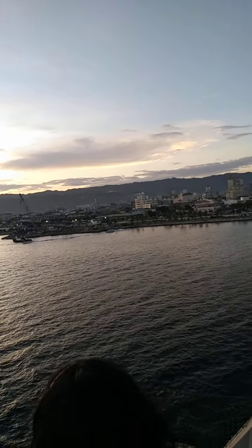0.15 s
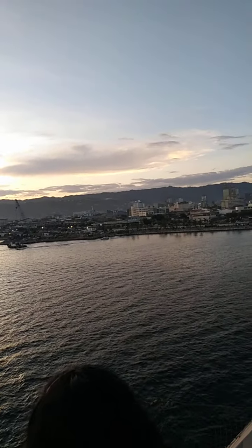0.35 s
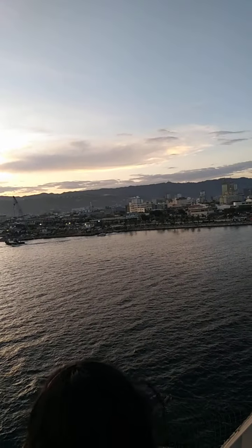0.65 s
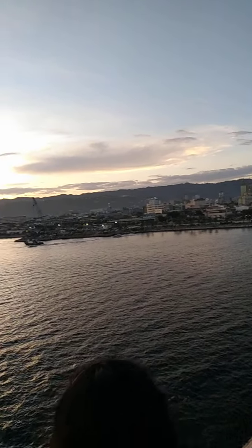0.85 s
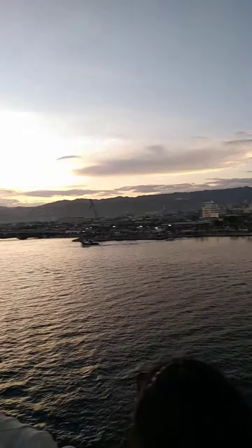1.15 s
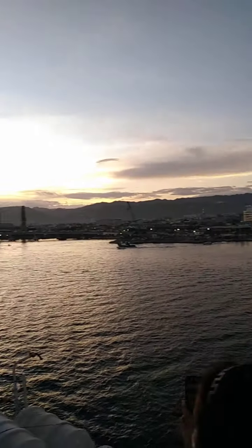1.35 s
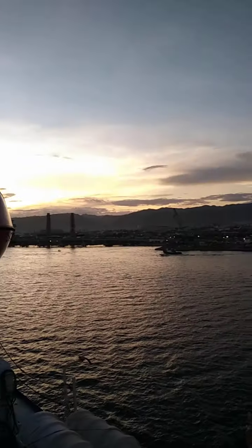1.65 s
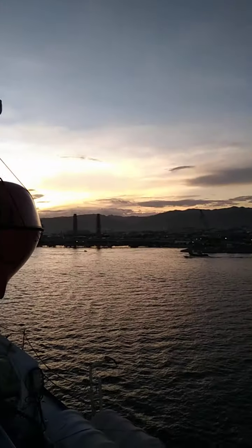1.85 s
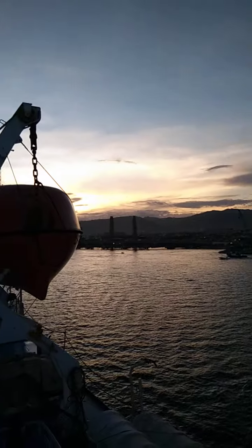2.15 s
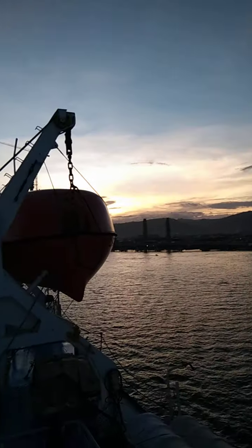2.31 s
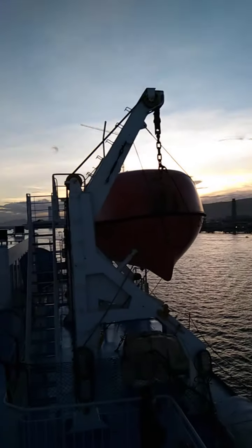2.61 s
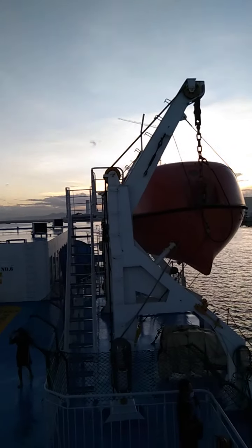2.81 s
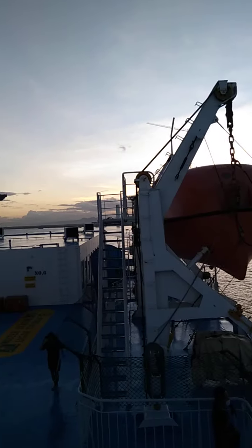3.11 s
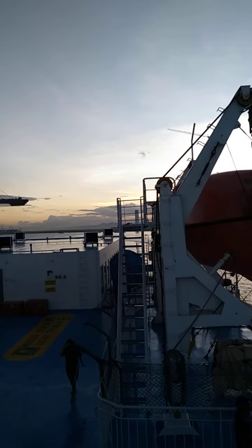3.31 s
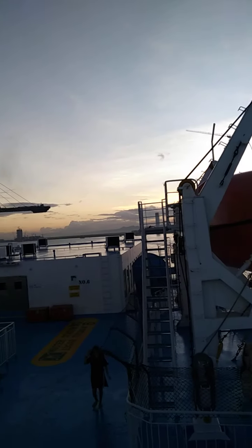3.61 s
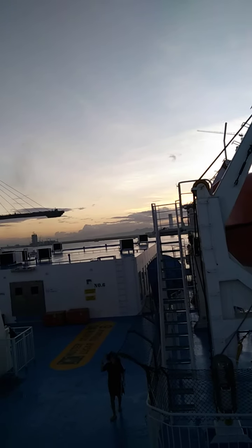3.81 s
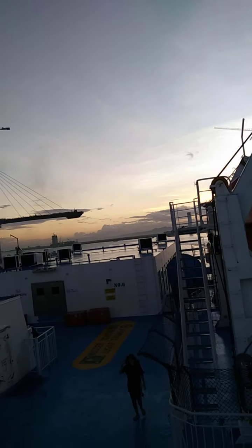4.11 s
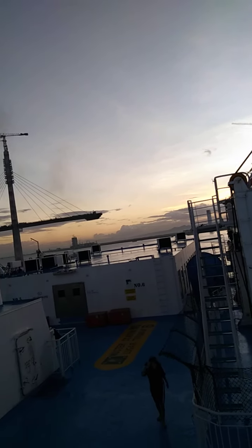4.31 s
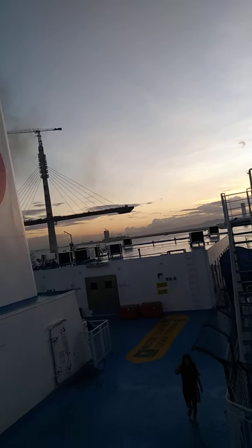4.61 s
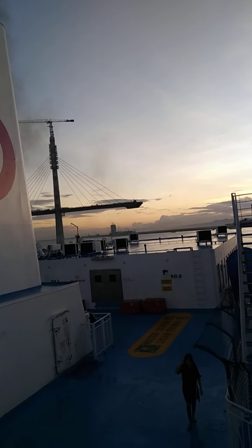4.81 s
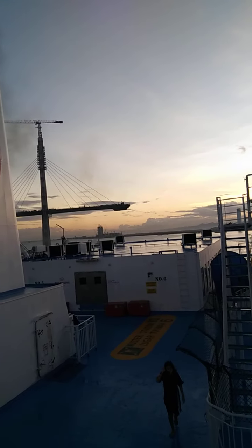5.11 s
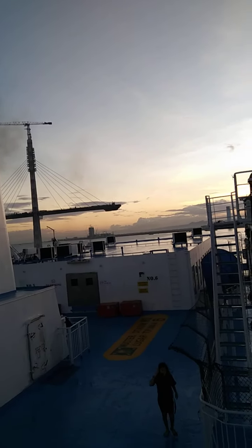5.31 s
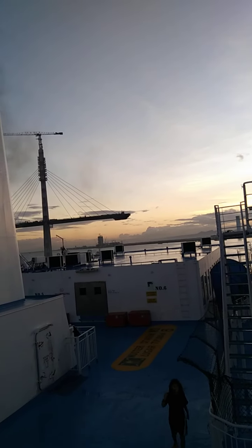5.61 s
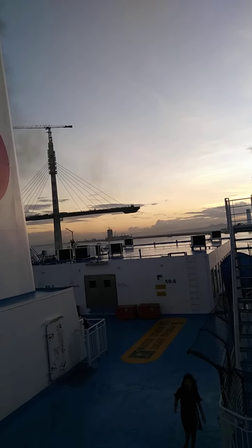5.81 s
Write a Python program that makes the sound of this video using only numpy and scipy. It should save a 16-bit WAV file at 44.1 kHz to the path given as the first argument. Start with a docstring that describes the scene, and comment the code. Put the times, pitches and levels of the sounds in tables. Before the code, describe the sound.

A ferry's steady diesel rumble and splashing water, with a brief whistling gust, followed by whirring ventilation.

```python
"""On a ferry's open deck, two diesels throb against each other from the start and a steel plate buzzes.
Water churns, gurgles and fizzes along the hull. At about 1.4 s come puffs of wind and the first of
a few light ticks. The puffs grow into one long, whistling hiss, which dies away near 3.5 s.
Then the listener turns toward the middle of the ship, and the whirr of the ventilation comes forward."""
import sys
import numpy as np
from scipy import signal
from scipy.fft import rfft, irfft
from scipy.io import wavfile

SR = 44100
rng = np.random.default_rng(int(sys.argv[2]) if len(sys.argv) > 2 else 0)


def unload_audio(sound):
    """Save the sound as a 16-bit wav file, at the path given as the first command line argument."""
    columns = np.transpose(np.atleast_2d(sound))
    # keep every value between -1 and 1, then stretch to whole-number steps
    steps = np.round(np.clip(columns, -1, 1) * 32767)
    wavfile.write(sys.argv[1], SR, steps.astype(np.int16))


N = 262386
T = np.arange(N) / SR
FREQS = np.maximum(np.fft.rfftfreq(N, 1 / SR), 1)


def gain(db):
    """Turn decibels into a number to multiply by."""
    return 10 ** (np.asarray(db) / 20)


def unit(x):
    """Scale a sound to an average strength (rms) of 1."""
    return x / np.sqrt(np.mean(x ** 2))


def curve(rows):
    """Join a timed table's points with straight lines, one curve for each column after the time."""
    times, *columns = np.transpose(rows)
    return [np.interp(T, times, column) for column in columns]


def db_at(hz, points):
    """Read the level at any pitch between (f/Hz, level/dB) points."""
    f, db = np.transpose(points)
    return np.interp(np.log(hz), np.log(np.sort(f)), db)


def colour(x, points):
    """Shape a sound's tone by (f/Hz, level/dB) points, fading beyond both ends; rms 1."""
    ends = 1 / (1 + (points[0][0] / FREQS) ** 8) / (1 + (FREQS / points[-1][0] / 1.11) ** 20)
    return unit(irfft(rfft(x) * gain(db_at(FREQS, points)) * ends, N))


def noise(points):
    """Smooth noise with the given tone; rms 1."""
    return colour(rng.standard_normal(N), points)


def wander(rate):
    """Smooth random drift of about 1 either way, with about `rate` new values a second."""
    size = int(N / SR * rate) + 4
    knots = rng.standard_normal(4096)[:size]
    return np.interp(T * rate * 8, np.arange(size * 8), signal.resample(knots, size * 8))


def band(hz, width_hz):
    """Noise gathered around one pitch."""
    phase = 2 * np.pi * hz * T
    return wander(width_hz) * np.cos(phase) + wander(width_hz) * np.sin(phase)


def swell(s, length_s):
    """A smooth rise and fall that peaks at time s."""
    out = np.zeros(N)
    near = slice(*np.searchsorted(T, [s - 2 * length_s, s + 2 * length_s]))
    out[near] = np.exp(-np.log(2) * (2 * (T[near] - s) / length_s) ** 2)
    return out


def grains(centre_hz, width_hz, fade_s, spread_db, count):
    """A swarm of tiny tones that fade in and out, scattered in time, pitch and strength; rms 1."""
    out, centre = np.zeros(N), centre_hz + 0 * T
    for when, pitch, span, softness, phase in rng.random((count, 5)):
        middle, half = int(when * N), int(SR * fade_s * (.6 + .8 * span))
        i = np.arange(max(middle - half, 0), min(middle + half, N))
        offset = i - middle
        hz = centre[middle] + width_hz * (pitch - .5)
        fade = np.cos(np.pi / 2 * offset / half) ** 2
        out[i] += gain(-spread_db * softness) * fade * np.sin(2 * np.pi * (hz * offset / SR + phase))
    return unit(out)


# Bursts of fine spray: peak t/s, spray level/dB, level/dB of the fizz it stirs up
SPRAY_BURSTS = [(1.43, -61, -88), (3.86, -63.5, -59.5)]

def spray_strength(rise_s=0.06, fall_s=0.12):
    """Each burst builds fast and settles more slowly; gives the strength of the spray and its fizz."""
    shapes = [np.exp(-np.maximum((s - T) / rise_s, (T - s) / fall_s)) for s, _, _ in SPRAY_BURSTS]
    return gain(np.array(SPRAY_BURSTS)[:, 1:].T) @ np.array(shapes)


# Tone of the steady air: f/Hz, relative level/dB
AIR_TONE = [(500, 16.5), (1200, 6), (2700, -2.5), (4500, -3.5), (7000, -6.5), (8300, -6.5), (9600, -17),
            (10700, -22), (11200, -5), (12600, -6), (14000, -10.5), (15500, -15)]

def air(burst):
    """Wisps of fine spray drift through the steady air."""
    spray = noise([(6000, 0), (8000, -7), (9300, -14), (10300, -1), (13000, -15), (15500, -19)])
    steady = noise(AIR_TONE) * gain(-65.5 + 1.3 * wander(54))
    return steady + spray * burst * gain(1.9 * wander(100))


# Light knocks: t/s, relative level/dB, ring f/Hz, ring width/Hz
TICKS = [(1.485, -58.5, 2950, 700), (3.018, -57.5, 2480, 403), (3.26, -62, 2500, 497),
         (3.823, -66, 3720, 402), (3.849, -59, 3190, 1000), (5.01, -70, 4980, 397),
         (5.184, -58.5, 2900, 1100), (5.186, -58.5, 4720, 1500), (5.44, -63, 4000, 260.4),
         (5.513, -65.5, 3100, 256), (5.648, -66, 4200, 219), (5.818, -66, 3330, 256),
         (5.854, -65, 4010, 300)]

def ticks(rise_s=0.00095, decay_s=0.024):
    """Light knocks nearby, each a short scuff that rings around one pitch."""
    out = np.zeros(N)
    for s, db, hz, width in TICKS:
        age = np.clip(T - s, 0, 1)
        shape = (1 - np.exp(-age / rise_s)) ** 2 * np.exp(-age / decay_s)
        out += gain(db + 4.5) * band(hz, width) * shape
    return out


# Loudness of the ventilation: t/s, relative level/dB
VENT_LEVEL = [(0, -54), (.2, -80), (.28, -61), (.6, -50.5), (.8, -60), (1.3, -50), (1.6, -57.5),
              (2.3, -51.5), (2.92, -54.5), (3.12, -44.5), (3.25, -49.5), (4.4, -47), (5.95, -50.5)]
# Its broad rush of air: t/s, centre f/Hz, share of the sound (0-1)
VENT_RUSH = [(0, 2146, .07), (3.12, 2080, 0.22), (4.0, 2196, 0.6), (4.4, 2202, 0.72), (4.7, 2061, 0.87),
             (5.95, 2102, 0.6)]

def ventilation(flutter_db=2.4):
    """Fluttering air rings in a duct, inside a broader rush that shifts as the listener turns."""
    (db,), (hz, share) = curve(VENT_LEVEL), curve(VENT_RUSH)
    narrow = grains(hz, 356, fade_s=0.017, spread_db=9.5, count=800)
    wide = grains(hz + 30, 740, fade_s=0.024, spread_db=3, count=500)
    rush = unit(narrow + 0.28 * wide)
    duct = grains(2134.5, 118, fade_s=0.011, spread_db=-0.5, count=700)
    whirr = np.sqrt(share) * rush + np.sqrt(1 - share) * duct
    return gain(db - 3.5 + flutter_db * wander(15)) * whirr


FAST_CYCLE_HZ, SLOW_CYCLE_HZ = 5.985, 3.435  # each diesel's four-stroke cycles a second
# Loudness of the shaking plate: t/s, relative level/dB
PLATE_LEVEL = [(0, -47.5), (.62, -46), (.8, -53.5), (2.2, -63.5), (5.95, -65.5)]

def plate(ring_hz=473, first_peak_s=0.071, rattle=0.59):
    """A steel plate hums, and buzzes once in every cycle of the fast diesel."""
    throb = (1 + np.cos(2 * np.pi * FAST_CYCLE_HZ * (T - first_peak_s))) / 2
    ring = np.sin(2 * np.pi * ring_hz * T) + rattle * band(445, 100)
    return gain(curve(PLATE_LEVEL)[0]) * (0.23 + throb ** 3) * ring


def diesel(cycle_hz, tones, speed_drift, unsteady=0.1):
    """All the tones follow one turning shaft; its speed drifts and the firings vary in strength."""
    angle = 2 * np.pi * np.cumsum(cycle_hz * (1 + speed_drift * wander(1.98))) / SR
    sways = [1 + unsteady * wander(5) for _ in range(5)]
    phases = rng.uniform(0, 2 * np.pi, len(tones))
    return np.sqrt(2) * sum(gain(db) * sways[i % len(sways)] * np.sin(multiple * angle + phases[i])
                            for i, (multiple, db) in enumerate(tones))


# Strong tones of each diesel: multiple of its cycle rate, relative level/dB
FAST_TONES = [(8, -57), (9, -63), (12, -50), (13, -62), (14, -65), (15, -54), (16, -60), (17, -58),
              (18, -64), (20, -51), (21, -59.5), (23, -61), (24, -62), (26, -60), (27, -60.5), (30, -64.5),
              (31, -64), (32, -63), (35, -61.5), (49, -66), (61, -68)]
SLOW_TONES = [(13, -57), (15, -46.5), (16, -53), (17, -57.5), (18, -61), (22, -59), (25, -60), (27, -58)]
# Outline of the fast diesel's many weak tones: f/Hz, relative level/dB
WEAK_TONES = [(35, -72), (55, -72), (110, -83), (190, -63), (250, -75.5), (285, -66), (350, -73),
              (395, -74.5), (420, -76), (470, -74.5), (520, -103)]
# Tone of the hull's rumble: f/Hz, relative level/dB
HULL_TONE = [(8, -23), (22, -2), (33, -19), (48, -4), (90, -0.5), (140, -2.5), (200, -9), (245, -11),
             (310, -9), (420, -15), (560, -20.5), (800, -26), (1500, -33)]

def engines(turn_start_s=3.5, turn_length_s=1.3):
    """Two diesels at different speeds throb against each other over the rumble of the hull."""
    strong = [k for k, _ in FAST_TONES]
    weak = [(k, db_at(k * FAST_CYCLE_HZ, WEAK_TONES)) for k in range(6, 86) if k not in strong]
    fast = diesel(FAST_CYCLE_HZ, FAST_TONES + weak, speed_drift=0.0004)
    slow = diesel(SLOW_CYCLE_HZ, SLOW_TONES, speed_drift=0.0025)
    hull = noise(HULL_TONE) * gain(-49.5)
    # turning toward the middle of the ship brings the fast engine up and shields the slow one
    turned = np.clip((T - turn_start_s) / turn_length_s, 0, 1)
    return fast * gain(-0.52 + 1.03 * turned) + slow * gain(-1.6 - 3.3 * turned) + hull


# Where bursting foam fizzes: f/Hz, width/Hz, relative level/dB
FOAM_BANDS = [(3220, 260, -4.5), (3870, 390, 1), (5040, 790, -10), (6380, 340, 1), (7494, 250, -2),
              (8010, 500, 0.5), (10900, 2200, -18)]

def foam(strength, flicker_db=1.5):
    """Bursting foam makes a thin, flickering fizz on top of the water."""
    tone = sum(gain(db) / (1 + (2 * (FREQS - hz) / width) ** 4) for hz, width, db in FOAM_BANDS)
    pops = grains(6900, 8200, fade_s=0.018, spread_db=21, count=4200)
    fizz = pops + 0.74 * rng.standard_normal(N)
    return strength * gain(flicker_db * wander(18)) * unit(irfft(rfft(fizz) * tone, N))


# Dull swishes beside the hull: peak t/s, f/Hz, width/Hz, level/dB, length/s
SWISHES = [(0.132, 1045, 343, -50, 0.027), (0.323, 1746, 294, -51.5, 0.12), (0.52, 1290, 150.7, -49, 0.042),
           (0.793, 2990, 304.6, -54, 0.069), (0.865, 3040, 404, -54.5, 0.03),
           (0.932, 1145, 248.7, -51.5, 0.18), (1.207, 1000, 402, -45.5, 0.11),
           (1.497, 1710, 553, -48.5, 0.032), (1.692, 630, 150, -46, 0.019), (2.08, 3360, 504, -56, 0.068),
           (2.563, 3200, 602, -67, 0.14), (2.592, 700, 252.6, -52.5, 0.039), (3.147, 2030, 200.8, -49, 0.1),
           (3.666, 906, 205, -50.5, 0.033), (3.767, 967, 199.7, -51, 0.048), (4.335, 850, 158.8, -52, .035),
           (4.681, 785, 221.7, -46.5, 0.014), (5.305, 1460, 300, -54, 0.037)]

def swishes():
    """Small crests collapse, each into a cloud of bubbles of about the same size."""
    return sum(gain(db) * swell(s, length) * band(hz, width) for s, hz, width, db, length in SWISHES)


# Ringing pockets of air: peak t/s, f/Hz, level/dB, length/s
GURGLES = [(0.813, 960, -40, 0.018), (0.868, 456.6, -43, 0.037), (0.928, 966, -47.5, 0.037),
           (1.06, 458, -41, 0.055), (1.184, 881, -45.5, 0.041), (1.236, 949, -48.5, 0.064),
           (1.365, 466, -42, 0.018), (1.78, 837, -43.5, 0.035), (2.091, 933, -44, 0.029),
           (2.239, 470, -49.5, 0.026), (2.495, 877, -44.5, 0.021), (3.244, 456, -46, 0.02),
           (3.326, 1513, -49.5, 0.061), (3.658, 1396, -51.5, 0.051), (3.846, 895, -48, 0.023),
           (3.918, 468, -48, 0.026), (3.976, 370.4, -42, 0.028), (4.024, 866, -41, 0.02),
           (4.075, 1330, -50.5, 0.094), (5.229, 853, -54.5, 0.037), (5.377, 1503, -48.5, 0.031),
           (5.483, 870, -49, 0.013), (5.531, 653, -48, .04), (5.596, 684, -44, 0.035),
           (5.651, 710, -47.5, 0.043)]

def gurgles(waver_hz=20):
    """Pockets of air caught in the water ring briefly at a wavering pitch."""
    waver = np.cumsum(waver_hz * wander(90)) / SR
    return np.sqrt(2) * sum(gain(db) * swell(s, length) * np.sin(2 * np.pi * (hz * T + waver))
                            for s, hz, db, length in GURGLES)


# Steady churning along the hull: t/s, relative level/dB
WASH_LEVEL = [(0, -54), (.55, -47.5), (1.05, -46.5), (1.65, -50.5), (2.4, -48), (3.3, -53.5), (3.57, -55.5),
              (3.8, -48.5), (4.22, -57.5), (5.1, -54.5), (5.95, -54)]
# Small breaking waves: peak t/s, relative level/dB, length/s
WAVELETS = [(.81, -47.5, 0.033), (0.922, -46.5, 0.089), (1.186, -45.5, 0.07), (1.35, -47.5, 0.081),
            (1.493, -45.5, 0.066), (1.883, -49, 0.064), (2.056, -49.5, 0.088), (2.227, -54, 0.062),
            (2.346, -48, 0.21), (2.518, -42.5, 0.086), (2.588, -44, 0.036), (2.677, -52, 0.036),
            (2.797, -46.5, .07), (3.11, -46, .06), (3.245, -47, 0.076), (3.33, -47, 0.091),
            (3.677, -42.5, 0.063), (3.838, -45, 0.042), (3.945, -46, .06), (4.055, -44, 0.13),
            (4.355, -48.5, 0.12), (4.462, -46, 0.09), (4.618, -50.5, 0.065), (4.688, -48.5, 0.063),
            (5.3, -52, 0.046), (5.374, -50, 0.031), (5.637, -45.5, 0.054), (5.86, -46.5, 0.11)]

def wash_strength():
    """How hard the water churns: a steady flow, plus a surge for each small wave."""
    surge_power = sum((gain(db) * swell(s, length)) ** 2 for s, db, length in WAVELETS)
    return np.sqrt(gain(curve(WASH_LEVEL)[0]) ** 2 + surge_power)


# Tone of the water heard over the side, and across the deck: f/Hz, relative level/dB
SIDE_TONE = [(400, 8), (470, 0.5), (600, -4.5), (760, -12.5), (930, 5.5), (1100, -2), (1380, -6.5),
             (1540, 2), (1720, -2.5), (1950, -1.5), (2300, -53), (2680, -28), (3000, -7), (3450, -8),
             (4300, -23)]
DECK_TONE = [(480, -51), (600, -4), (720, -0.5), (870, 3), (990, -3.5), (1130, -46), (1260, -6.5),
             (1370, 3), (1530, 5), (1720, -10.5), (2700, -19.5), (3200, -30.5), (3600, -25), (4000, -16),
             (4400, -53)]
# How much of the water is heard across the deck: t/s, share (0-1)
DECK_SHARE = [(0, 0), (1.4, 0.18), (1.9, 0.33), (2.4, 1)]

def wash(strength):
    """Bubbles swarm in the water breaking along the hull; echoes off the deck make it sound hollow."""
    share = curve(DECK_SHARE)[0]
    bubbles = grains(2405.3, 4037, fade_s=0.016, spread_db=14, count=5200)
    water = (bubbles + 0.48 * noise([(400, 0), (4400, 0)])) * gain(2.8 * wander(80))
    heard = np.sqrt(1 - share) * colour(water, SIDE_TONE) + np.sqrt(share) * colour(water, DECK_TONE)
    return strength * gain(-5) * heard


# Puffs ahead of the gust: peak t/s, level/dB, length/s
PUFFS = [(1.361, -54, 0.053), (1.454, -52, 0.047), (1.529, -49.5, 0.077)]
# The long gust, which starts at its first point and dies away after its last: t/s, level/dB
GUST = [(1.58, -48.5), (1.79, -44.5), (2.07, -42.5), (2.13, -47), (2.26, -47.5), (2.31, -44), (2.5, -42.5),
        (2.75, -44.5), (3.22, -44), (3.42, -47.5)]

def wind_strength(rise_s=0.028, fall_s=0.081):
    """How hard the wind blows: short puffs, then one long gust."""
    puffs = sum(gain(db) * swell(s, length) for s, db, length in PUFFS)
    rise = np.clip((T - GUST[0][0]) / rise_s, 0, 1)
    fall = np.exp(-(np.maximum(T - GUST[-1][0], 0) / fall_s) ** 2)
    return puffs + gain(curve(GUST)[0]) * rise * fall


# Thin whistles in the deck gear: f/Hz, relative level/dB
WHISTLES = [(3715, -8.5), (4018, -2), (4360, 0), (4550, 1.5), (4773, 1), (5148, -5)]

def whistles(blowing, width_hz=22):
    """The wind makes the deck gear ring with thin, wavering notes."""
    rings = sum(gain(db) * band(hz, width_hz) for hz, db in WHISTLES)
    return gain(-12) * blowing * unit(rings)


# Tone of the wind's hiss: f/Hz, relative level/dB
HISS_TONE = [(2700, -62), (3350, -14.5), (3800, 0.5), (4750, 0.5), (5700, -1.5), (6250, -13.5),
             (7000, -11.5), (7450, -10.5), (8100, -13.5), (8550, -34), (9200, -19), (11000, -50)]

def wind(blowing, full_jet_db=-47):
    """Wind hisses past an edge: a thin ringing core when weak, a broad jet at full strength."""
    edge_hz = 3990 + 106 * wander(5)  # the strongest ring drifts in pitch
    jet_share = np.clip(2 * blowing / gain(full_jet_db) - 1, .15, 1)
    core = grains(4850, 1425, fade_s=0.021, spread_db=3, count=1200)
    # swirls of air blur into a smooth rush at middle pitches and stand apart higher up
    swirls = grains(6100, 6400, fade_s=0.041, spread_db=26, count=4200)
    rush = noise([(3600, 0.5), (6000, 3.5), (7000, -6.5), (9000, -24)])
    edge = grains(edge_hz, 285, fade_s=0.02, spread_db=4, count=700)
    jet = unit(colour(swirls + 0.9 * rush, HISS_TONE) + gain(-13) * edge)
    # the edge sounds again an octave above the core
    sheen = gain(-17) * noise([(8800, -22), (9300, -11), (9650, -3), (10550, -5.5), (11200, -24)])
    hiss = np.sqrt(jet_share) * (jet + sheen) + np.sqrt(1 - jet_share) * core
    return hiss * gain(0.95 * wander(110)) * blowing


def scene():
    """Everything heard from one place on the deck, in one channel."""
    churning, blowing = wash_strength(), wind_strength()
    spray, stirred_fizz = spray_strength()
    machinery = engines() + plate() + ventilation()
    fizz = foam(churning * gain(-21) + stirred_fizz)
    water = wash(churning) + swishes() + gurgles() + fizz
    return (machinery + water + wind(blowing) + whistles(blowing) + air(spray) + ticks())[None]


def record(dry):
    """Cut away the very highest treble."""
    top_hz = 15450
    return signal.sosfilt(signal.ellip(12, .2, 80, top_hz, fs=SR, output="sos"), dry)


dry = scene()
out = record(dry)
unload_audio(out)
```